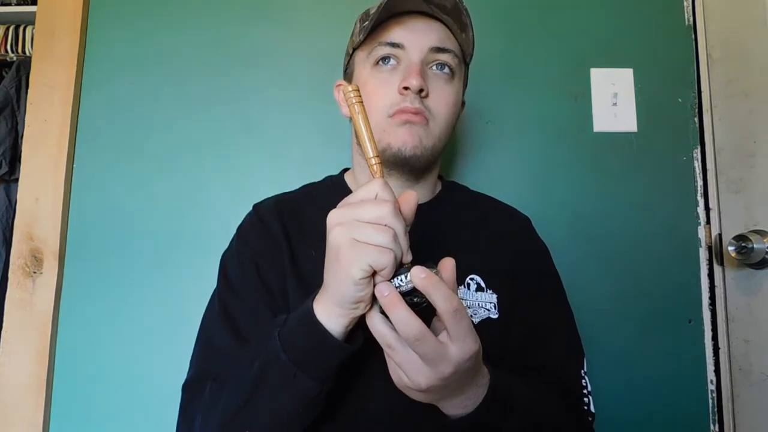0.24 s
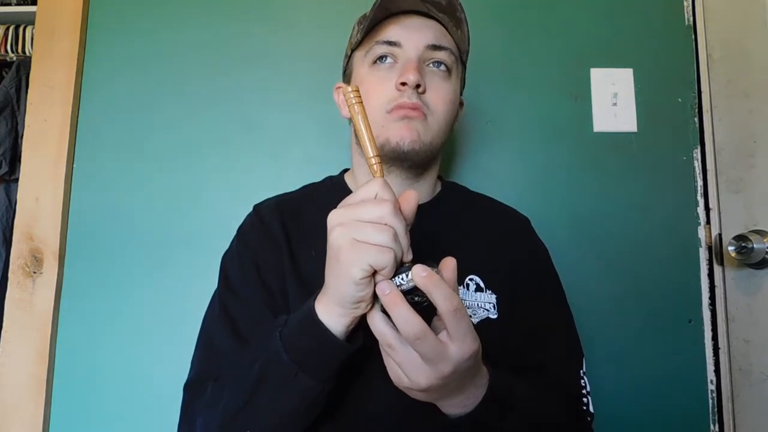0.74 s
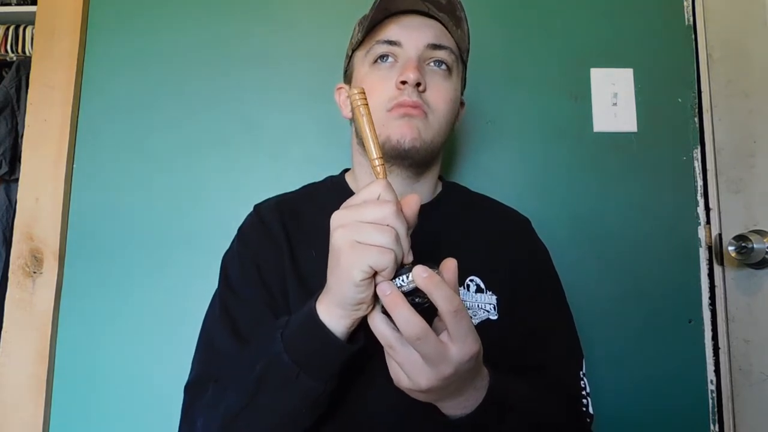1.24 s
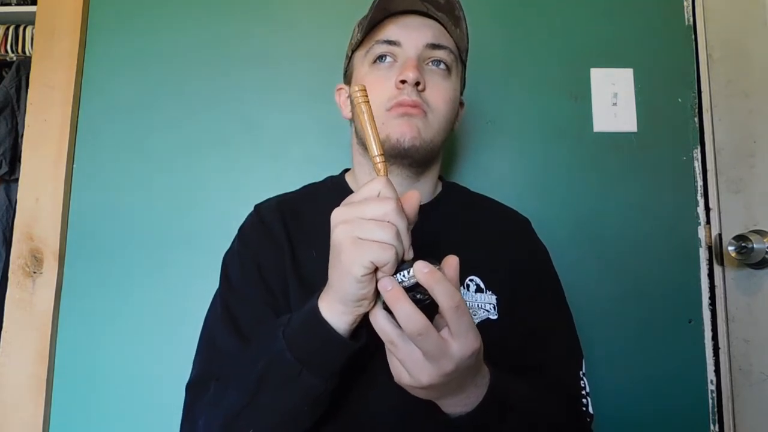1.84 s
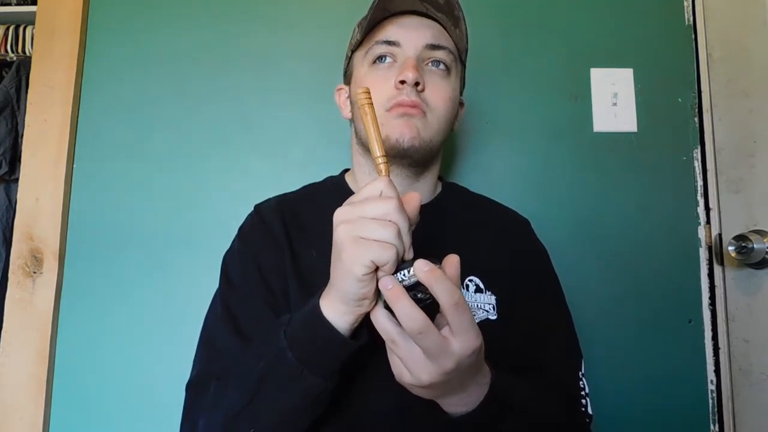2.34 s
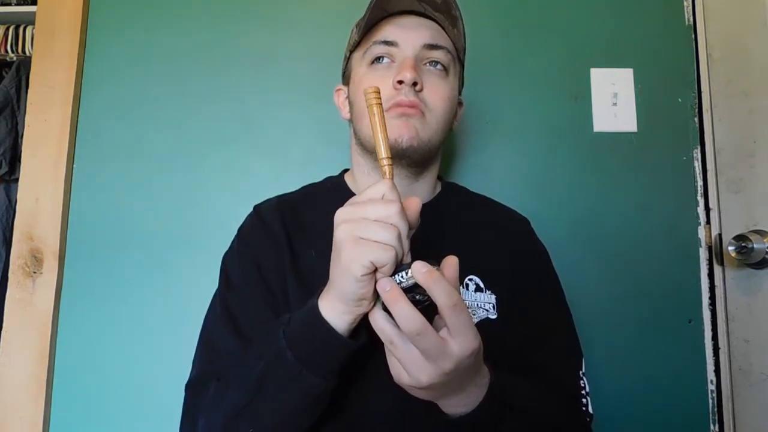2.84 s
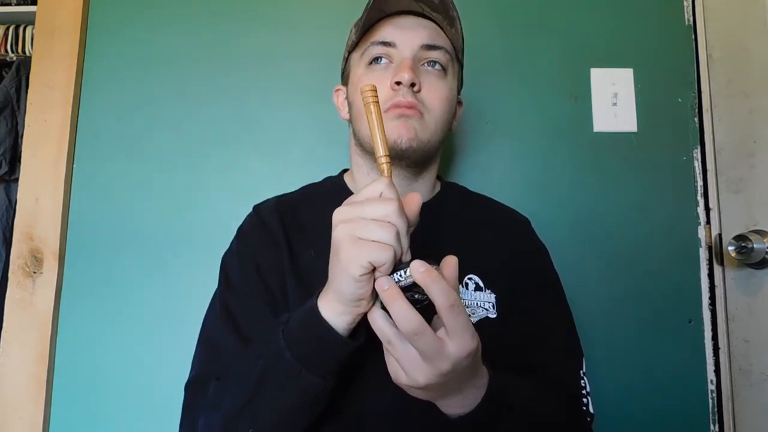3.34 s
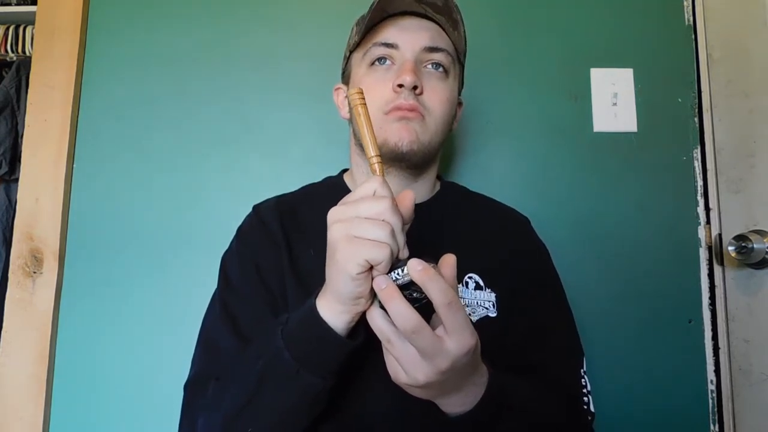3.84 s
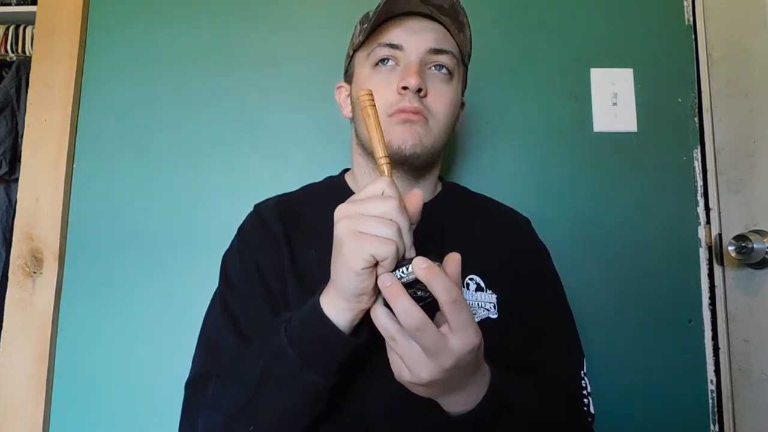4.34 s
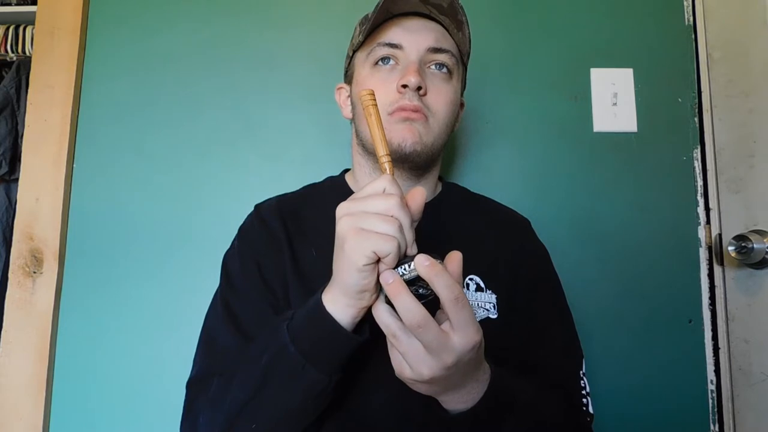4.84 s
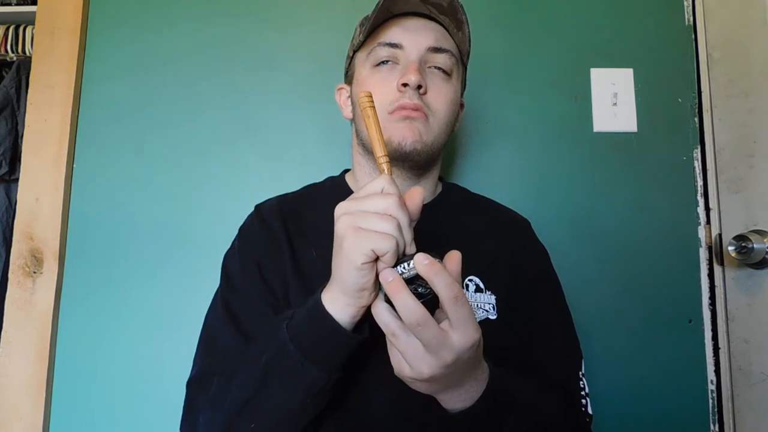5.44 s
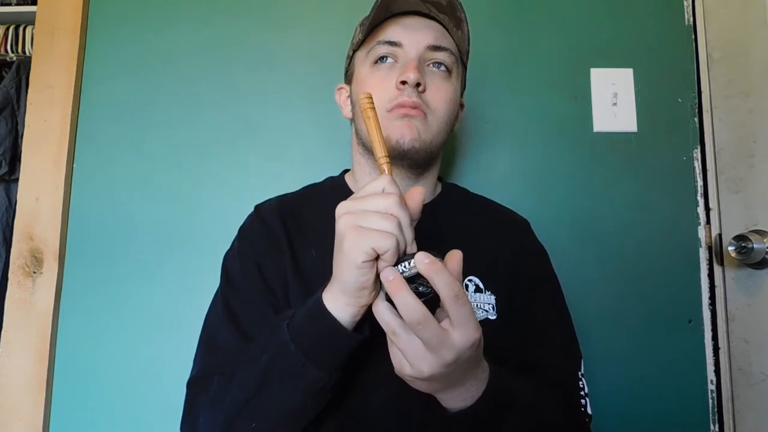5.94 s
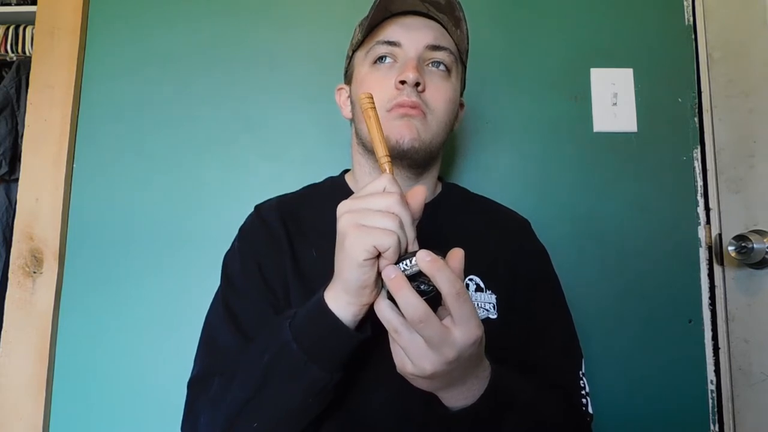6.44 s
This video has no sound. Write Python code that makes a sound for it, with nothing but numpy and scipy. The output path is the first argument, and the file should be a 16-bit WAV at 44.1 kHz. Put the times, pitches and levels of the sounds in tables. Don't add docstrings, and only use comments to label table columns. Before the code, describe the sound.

Close in a small bare room, a wooden peg scrapes a slate friction call. A brief fluttering purr comes first, then a softer double cluck, then seven or so hard, hollow, nasal clucks about a third of a second apart. After a short gap come four whining purrs that coarsen into rasps, ending on a clipped start of another. Quiet room hush and faint low handling thumps lie beneath.

```python
import sys
import numpy as np
from scipy import signal
from scipy.fft import rfft, irfft
from scipy.io import wavfile
from scipy.ndimage import uniform_filter1d

SR = 44100
rng = np.random.default_rng(int(sys.argv[2]) if len(sys.argv) > 2 else 0)


def inscribe(sig):
    pcm = np.round(np.clip(np.atleast_2d(sig).T, -1, 1) * 32767)
    wavfile.write(sys.argv[1], SR, pcm.astype(np.int16))


def makeup_ratio(level_db):
    decades = np.asarray(level_db, float) / 20
    return 10 ** decades


N = 295029


def at_hz(points, hz, axis=1):
    points = np.array(points)
    return np.interp(np.log(np.maximum(hz, 1)), np.log(points[:, 0]), points[:, axis])


def rms_one(x):
    return x / np.sqrt(np.mean(x ** 2) + 1e-20)


def coloured(x, gain_db):
    size = x.shape[-1]
    hz = np.arange(size // 2 + 1) * SR / size
    return irfft(rfft(x) * makeup_ratio(gain_db(hz)), size)


def hush():
    # hz, density_db [dB per Hz]
    air_density = [(12, -23), (20, 0.5), (65, -4), (88, -20), (127, -7.5), (146, -19), (182, -13),
                   (210, -15), (607, -8.5), (897, -11.5), (1530, -9.5), (1760, -11.5), (2670, -14.5),
                   (3340, -20.5), (16000, -38)]
    # hz, likeness [0 to 1]
    air_likeness = [(60, 0.94), (180, 0.6), (550, 0.45), (1650, 0.066), (4970, 0.0067), (15000, 0.029)]
    # hz, level_db [rms]
    mains_lines = [(60, -71.5), (120, -86.5), (180, -80), (240, -77.5)]

    def share_db(hz, sign):
        alike = np.clip(at_hz(air_likeness, hz), 0, 1)
        return at_hz(air_density, hz) + 10 * np.log10(1.001 + sign * alike)

    mid, side = rng.standard_normal((2, N))
    mid = coloured(mid, lambda hz: share_db(hz, 0.52))
    side = coloured(side, lambda hz: share_db(hz, -1))
    air = makeup_ratio(-58.5) * rms_one(np.stack([mid + side, mid - side]))
    t = np.arange(N) / SR
    hum = sum(makeup_ratio(level_db - 1.5) * np.sin(2 * np.pi * hz * t) for hz, level_db in mains_lines)
    return (air + hum) * makeup_ratio(np.array([[.5], [-.5]]))


def slips():
    # start_s, level_db, length_s, low_hz [lowest chatter rate]
    rasps = [(.104, -23.5, 0.017, 1066), (0.129, -21.5, 0.012, 941), (4.3, -22, .018, 967),
             (4.336, -21, 0.014, 904), (4.372, -23, 0.016, 900), (4.43, -28, .014, 1000),
             (5.023, -24, 0.014, 944), (5.095, -23.5, 0.012, 959), (5.139, -23, 0.018, 922),
             (5.181, -24.5, 0.021, 869), (5.218, -24, .017, 875), (5.625, -22, .019, 813),
             (5.66, -24.5, .018, 824), (5.706, -22.5, 0.018, 814), (5.751, -23.5, 0.0109, 794),
             (6.109, -21, 0.015, 808), (6.14, -21, 0.016, 871), (6.187, -20, 0.015, 809),
             (6.239, -22.5, 0.0099, 840), (6.277, -26, .011, 853), (6.644, -24, 0.02, 927)]
    # start_s, level_db, length_s
    whines = [(.157, -24, .01), (0.178, -35.5, 0.014), (.205, -27, 0.019), (.224, -31, 0.0091),
              (0.24, -30.5, 0.011), (4.02, -57.5, 0.0071), (4.04, -41.5, 0.019), (4.056, -41, 0.025),
              (4.097, -44, 0.031), (4.14, -33, 0.023), (4.163, -40, 0.022), (4.192, -39.5, 0.026),
              (4.239, -36.5, 0.017), (4.269, -25.5, 0.019), (4.29, -42, .009), (4.768, -33.5, 0.017),
              (4.8, -29, 0.013), (4.825, -33.5, 0.02), (4.874, -31.5, 0.018), (4.904, -30, 0.018),
              (4.939, -28.5, .016), (4.99, -29.5, 0.017), (5.518, -42, 0.013), (5.539, -38, .01),
              (5.548, -28, 0.018), (5.563, -25.5, 0.017), (5.808, -43, 0.011), (6.071, -26.5, 0.021),
              (6.1, -31.5, 0.015), (6.574, -28.5, 0.013)]
    # time_s, rate_hz
    grip_rate = [(.15, 1109), (.215, 1180), (.25, 1120), (4.04, 1064), (4.15, 1147), (4.95, 1133),
                 (5.0, 1062), (5.5, 992), (5.57, 1053), (5.8, 962), (6.08, 1093), (6.11, 1120),
                 (6.57, 1056)]
    # start_s, level_db, length_s, low_hz [lowest rate], last_hz [final rate]
    clucks = [
        (0.566, -18.5, 0.018, 885, 980),
        (0.595, -23, .042, 951, 1104),
        (.995, -14.5, .021, 872, 1077),
        (1.317, -14.5, 0.021, 844, 1108),
        (1.644, -13.5, 0.02, 876.6, 1230),
        (2.049, -14, 0.033, 830, 1205),
        (2.418, -14, 0.026, 809.4, 1193),
        (2.793, -14, .026, 844, 1228),
        (3.172, -14.5, 0.025, 887, 1300),
        (3.504, -15.5, 0.024, 927.4, 1145),
    ]
    # start_s, level_db, rate_hz
    rebounds = [
        (.586, -20, 1096),
        (1.035, -23.5, 1280),
        (1.349, -35.5, 1147),
        (1.684, -27.5, 1339),
        (2.463, -18.5, 1127),
        (2.476, -31.5, 1170),
        (2.828, -17.5, 1149),
        (3.221, -28.5, 1318),
        (3.535, -22, 1232),
    ]
    recovery, free_hz = 0.83, 1180
    rebound_s = .013

    def bite_hz(level_db):
        return 1120 + 27 * (level_db + 22)

    def light(hz):
        return hz * 1.027, hz, hz * 1.045

    found = []
    for s, db, length, low, last in clucks:
        found.append((s, db, length, bite_hz(db), low, last))
    for s, db, hz in rebounds:
        found.append((s, db, rebound_s, *light(hz)))
    for s, db, length, low in rasps:
        found.append((s, db, length, bite_hz(db), low, low + recovery * (free_hz - low)))
    for s, db, length in whines:
        found.append((s, db, length, *light(np.interp(s, *np.transpose(grip_rate)))))
    return found


def slip(level_db, length, first_hz, low_hz, last_hz, noise, sag=0.42, fall=0.16, ease=1.0):
    # hz, gain_db
    pot_radiation = [(780, -16.5), (930, -14), (1180, -6.5), (1650, 1.5), (2250, 1.5), (2600, -5.5),
                     (3300, -4), (3900, -16), (4700, -31), (5750, -26), (6700, -33.5), (9000, -39),
                     (11200, -36.5), (15500, -51.5)]
    # harmonic [number], slope [dB per dB of level]
    overtone_hardening = [(1, -0.2859), (2, 0), (3, 0.29), (4, 0.57), (5, -0.06), (6, 0.63), (10, 0.6),
                          (16, 1.4)]
    u = np.arange(round(length * SR)) / (length * SR)

    sag = min(sag, .0095 / length)
    down = np.clip(1 - u / sag, 0, 1)
    up = np.clip((u - sag) / (1 - sag), 0, 1)
    rate = low_hz + (first_hz - low_hz) * np.sin(np.pi / 2 * down) ** 1.4
    rate = rate + (last_hz - low_hz) * up ** 1.63
    uneven_slate = uniform_filter1d(noise[:len(u)], size=40) * np.sqrt(40)
    rate = rate * (1 + 0.0089 * uneven_slate)

    if first_hz - low_hz > 150:
        rise = min(.4, .0065 / length)
    else:
        rise = np.clip(.35 - .02 * (level_db + 15), .3, .58)
    growth = 1.8 + .2 * max(level_db + 23.0, 0)
    swell = np.sin(np.pi / 2 * np.clip(u / rise, 0, 1)) ** growth
    swell = swell * np.sin(np.pi / 2 * np.clip((1 - u) / fall, 0, 1))
    swell = swell * np.exp(-ease * np.clip(u - rise, 0, 1))

    k = np.arange(1, 17)[:, None]
    purity_db = at_hz(overtone_hardening, k) * (level_db + 22)
    gain = makeup_ratio(at_hz(pot_radiation, k * rate) + purity_db)
    gain = gain * swell ** (1 + 0.0098 * (k - 1))
    phase = k * 2 * np.pi * np.cumsum(rate) / SR - .1 * k ** 2
    tone = np.sum(gain * (k * rate < 16000) * np.cos(phase), axis=0)
    return makeup_ratio(level_db) * tone, swell ** 2


def striker(grit_db=-19, bite=2.0):
    # hz, density_db [dB per Hz]
    grit_density = [(600, -41), (850, -7.5), (1500, 1.5), (2600, -0.5), (3800, 2), (4800, -23.5),
                    (8000, -15.5), (11000, -38.5), (16000, -34)]
    tone, scrape = np.zeros(N + SR), np.zeros(N + SR)
    noises = rng.standard_normal((100, SR // 10))
    for (s, level_db, *shape), noise in zip(slips(), noises):
        burst, swell = slip(level_db, *shape, noise)
        i = round(s * SR)
        tone[i:i + len(burst)] += burst
        scrape[i:i + len(burst)] += swell * makeup_ratio(bite * (level_db + 20) - 20 + grit_db)
    grit = rms_one(coloured(rng.standard_normal(N), lambda hz: at_hz(grit_density, hz)))
    return tone[:N] + scrape[:N] * grit


def diffuse_tail(t, build_s=0.012):
    # hz, t60_s, level_db
    band_decay = [(710, 0.083, 0), (1000, 0.19, 6), (1547, 0.16, 6), (2185, 0.17, -0.5), (3300, 0.17, 0.5),
                  (5000, 0.2, -2), (12220, 0.15, -0.5)]
    white = rng.standard_normal((2, len(t)))
    edges = 400 * 2 ** np.arange(0, 5.6, .5)
    tail = 0
    for low, high in zip(edges, edges[1:]):
        band = signal.sosfilt(signal.butter(2, [low, high], "band", fs=SR, output="sos"), white)
        band = band + 0.23 * (low < 2500) * band[::-1]
        centre = np.sqrt(low * high)
        t60, level_db = at_hz(band_decay, centre, axis=1), at_hz(band_decay, centre, axis=2)
        tail = tail + band * makeup_ratio(level_db - 60 * t / t60)
    tail = tail * (1 - np.exp(-(t / build_s) ** 2))
    lines = rfft(tail)
    even = uniform_filter1d(abs(lines), size=400) / uniform_filter1d(abs(lines), size=20)
    return irfft(lines * even, len(t)) * (t < .4)


def room(x, tail_db=-3.0, ring_db=-43.5):
    # delay_s, left, right [pressure shares]
    first_echoes = [(0.00216, 0.7, -0.073), (.00415, 0.27, 0.13), (.00399, -0.21, -0.2),
                    (.00855, -0.45, -0.33), (.00955, -0.66, 0.14), (.01145, 0.23, 0.22),
                    (0.013, 0.047, 0.19), (0.018, -0.061, -0.048), (0.025, -0.033, 0.11),
                    (0.019, -0.26, -0.3)]
    # hz, level_db, t60_s
    ringing_modes = [(966, -12, .2), (1136, -15, .2), (1250, -8, .2), (1360, -10, .2), (1712, -14, .18),
                     (1912, -15, .18), (2273, -15, .17), (2428, -14, .16), (2740, -16, .17),
                     (2888, -14, .18), (3340, -22, .12), (3466, -20, .12)]
    # hz, left_minus_right_db
    close_lean = [(700, -3.5), (1300, 5.5), (2400, -2), (4400, -5), (15000, -3.5)]
    t = np.arange(SR // 2) / SR
    tail = diffuse_tail(t)
    answer = makeup_ratio(tail_db) * tail / np.sqrt(np.sum(tail ** 2) / 2)
    phases = rng.uniform(0, 2 * np.pi, (len(ringing_modes), 2, 1))
    for (hz, level_db, t60), phase in zip(ringing_modes, phases):
        answer += makeup_ratio(ring_db + level_db - 60 * t / t60) * np.sin(2 * np.pi * hz * t + phase)
    for delay, left, right in first_echoes:
        answer[:, round(delay * SR)] += [left, right]
    left = coloured(x, lambda hz: at_hz(close_lean, hz) / 2)
    right = coloured(x, lambda hz: -at_hz(close_lean, hz) / 2)
    direct = np.stack([np.roll(left, 1), right])
    return direct + signal.fftconvolve(x[None], answer, axes=1)[:, :N]


def thumps(length_s=0.046, top_hz=80):
    # start_s, peak_db
    shoves = [
        (0.431, -55.5),
        (0.944, -72),
        (1.602, -50),
        (2.072, -56),
        (2.697, -51.5),
        (3.296, -65),
        (3.945, -55),
        (5.213, -55),
        (5.93, -76.5),
    ]
    t, swell = np.arange(N) / SR, np.zeros(N)
    for s, peak_db in shoves:
        after = np.clip((t - s) / length_s, 0, 50)
        swell += makeup_ratio(peak_db - 1.0) * after * np.exp(1 - after * 1.84)
    band = signal.butter(2, [18, top_hz], "band", fs=SR, output="sos")
    return swell * rms_one(signal.sosfilt(band, rng.standard_normal(N)))


def smear(x, level_db=-34, size=1024):
    # hz, density_db [dB per Hz]
    hiss_colour = [(500, -15), (2000, 0), (5000, 0), (10000, -1), (16000, -1)]
    power = np.mean(x ** 2, axis=0)[:N // size * size].reshape(-1, size).mean(axis=1)
    both = np.convolve(power, [.5, .5])
    swell = np.sqrt(np.interp(np.arange(N) / size, np.arange(len(both)), both))
    hiss = coloured(rng.standard_normal((2, N)), lambda hz: at_hz(hiss_colour, hz))
    return x + makeup_ratio(level_db) * swell * rms_one(hiss)


def scene():
    return room(striker()) * makeup_ratio(-1.5) + hush() + thumps()


def top_cut(x):
    return signal.sosfilt(signal.butter(12, 16350, fs=SR, output="sos"), x)


def record(dry):
    low_pass = signal.cheby2(12, 60, 16200, fs=SR, output="sos")
    mix = signal.sosfilt(low_pass, smear(dry))
    return top_cut(mix)


dry = scene()
out = record(dry)
inscribe(out)
```